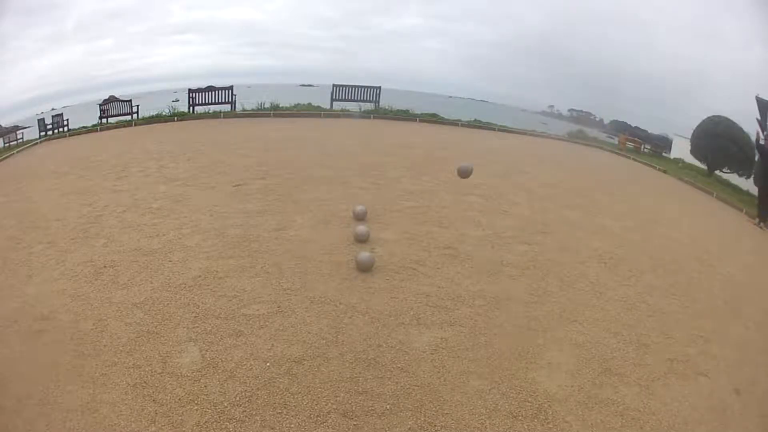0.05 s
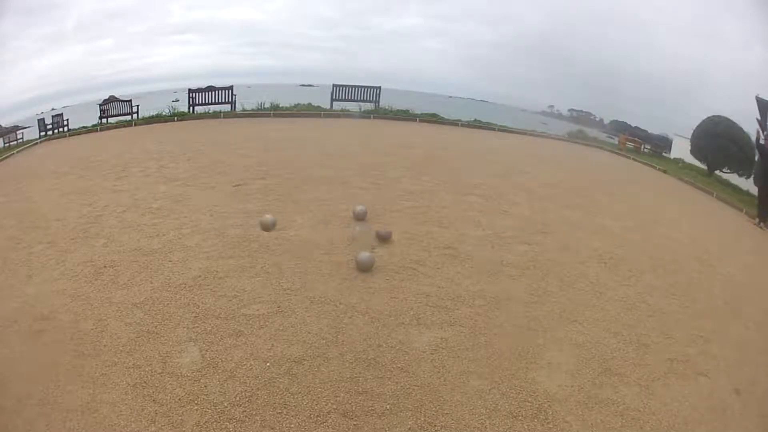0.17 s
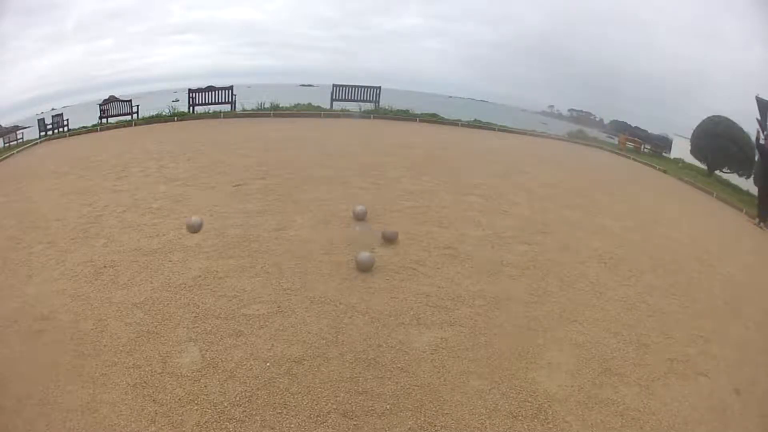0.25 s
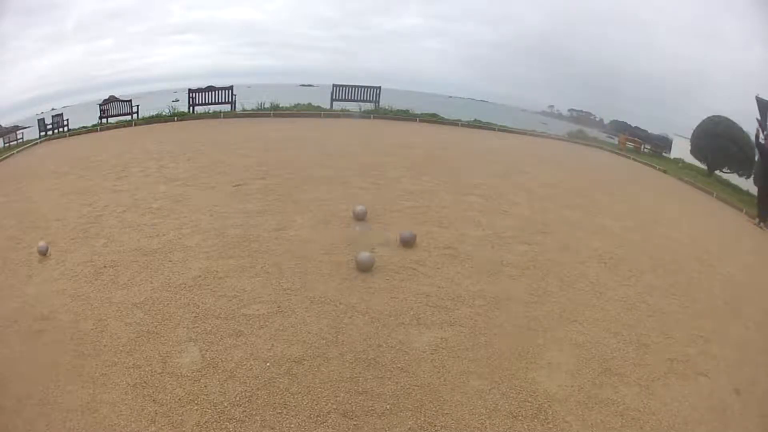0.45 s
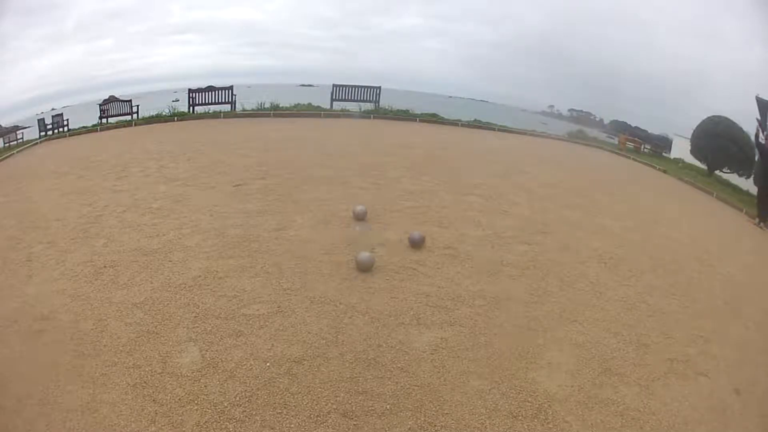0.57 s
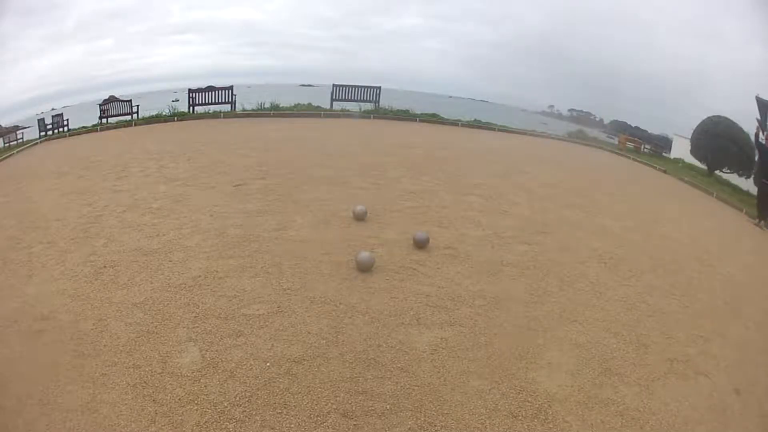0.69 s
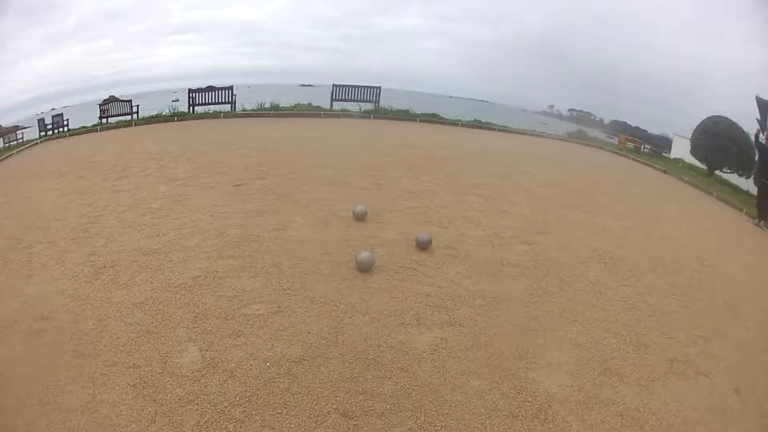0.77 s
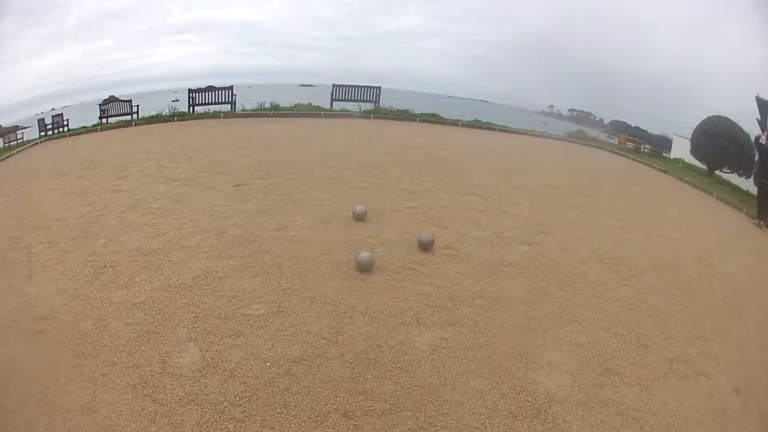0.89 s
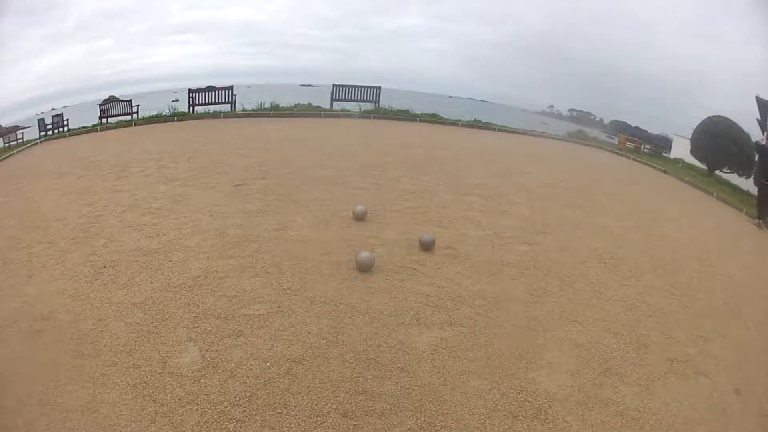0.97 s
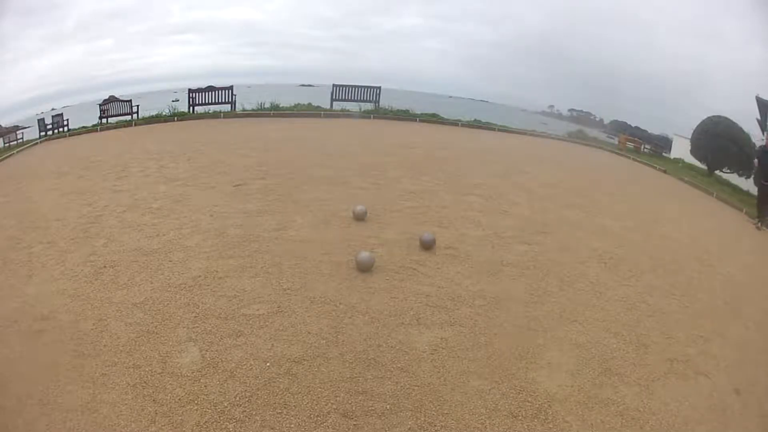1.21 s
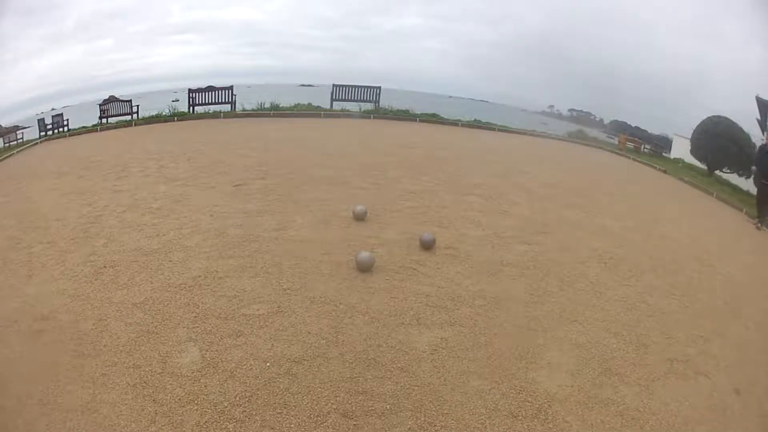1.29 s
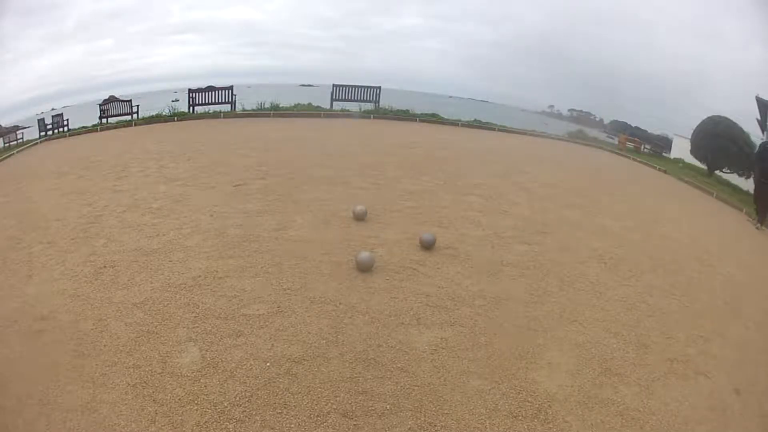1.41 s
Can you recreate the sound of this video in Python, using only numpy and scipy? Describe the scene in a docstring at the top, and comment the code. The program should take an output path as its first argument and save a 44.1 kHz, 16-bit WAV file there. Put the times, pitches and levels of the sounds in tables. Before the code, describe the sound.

One sharp clack of metal boules colliding on gravel, followed by faint, quickening bounces.

```python
"""A gravel boules pitch by the sea, the microphone in a camera standing on the ground.
Close by, a thrown steel boule clacks against another. Grit sprays, and a boule hops away in
shortening bounces, each a faint tick through the air and then a thud through the ground that
shakes the camera. Farther off comes a dull knock, probably the edge board, and a boule rolls on
over the soft wash of the seaside air."""
import sys
import numpy as np
from scipy.fft import rfft, irfft, next_fast_len
from scipy.io import wavfile

SR = 44100
rng = np.random.default_rng(int(sys.argv[2]) if len(sys.argv) > 2 else 0)


def bounce(signal):
    """Save signal as a 16-bit WAV file at the path given by the first command-line argument."""
    frames = np.transpose(np.atleast_2d(signal))
    limited = np.clip(frames, -1, 1)
    pcm = np.round(limited * 32767).astype(np.int16)
    wavfile.write(sys.argv[1], SR, pcm)


N = 63945

# first crack of steel on steel: f/Hz, peak/dB, half-length/s
CRACK_PULSES = [(3770, -14, 0.00047), (8630, -28, .0005)]
# ring of the boules: f/Hz, relative level/dB, t60/s
STEEL_MODES = [(1400, -18, .02), (1680, -18, .02), (2175, -1, .028), (3270, -1, .014), (3600, -7, .012),
               (4100, -8, .012), (4720, -8, .015), (7250, -14, .02), (8000, -14, .012), (8680, -10, .013),
               (9830, -14, .02), (14200, -17, .022), (15130, -17, .018)]
# the clack scattered back by the ground: f/Hz, relative level/dB
SCATTER_COLOUR = [(200, -4), (480, -4), (680, -9), (1100, 3.5), (2200, 3), (3500, -12), (5000, -26),
                  (8000, -20), (10000, -4), (12000, -46), (14500, -10)]
# low ring of the camera mount after the clack: f/Hz, level/dB, t60/s
MOUNT_MODES = [(267.4, -30, 0.15), (457, -44.5, 0.095), (534, -43, 0.1), (893, -37, 0.061),
               (1110, -43, 0.039)]
# landings: t/s, tick level/dB, thud peak/dB, thud f/Hz, thud half-length/s
LANDINGS = [(0.2128, -31.5, -21.5, 156, 0.0086), (0.2438, -86, -32.5, 165, 0.0099),
            (.4750, -51.5, -29, 181, 0.008), (0.5893, -57.5, -43.5, 186, 0.0084),
            (.6805, -57.5, -43.5, 181.4, 0.0059), (0.7782, -59, -53, 190, 0.021),
            (.8325, -58, -59, 185, 0.0082), (.8910, -56, -61, 188, 0.015)]
# tick of grit under a boule: f/Hz, relative level/dB
TICK_COLOUR = [(1000, -34), (3000, 4.5), (4500, 2.5), (7500, 1), (10000, -13), (15000, -22)]
# after-ring of the ground and of the camera mount (272.8 Hz): f/Hz, level re the thud/dB, t60/s
THUD_RING_MODES = [(158.3, -17, 0.27), (187.5, -11, 0.23), (210, -21, 0.067), (272.8, -22.5, 0.34)]
# sway of the camera stand: f/Hz, level re the shake/dB, t60/s
STAND_MODES = [(54.66, -29.5, 0.58), (71.9, -32.5, 0.79)]
# showers of grit: t/s, level/dB, t60/s
SHOWERS = [(0.2419, -32.5, 0.024), (0.2518, -37, 0.049), (0.2782, -48.5, 0.071), (0.2923, -49, 0.053),
           (0.3083, -47.5, 0.029)]
# flying grit: f/Hz, relative level/dB
GRIT_COLOUR = [(200, -18), (500, -1), (1100, -3), (1650, 3.5), (2300, 1), (3200, -5), (4200, -22.5),
               (7500, -25.5), (9800, -9.5), (12000, -28), (14300, -16)]
# a boule skidding on gravel: f/Hz, relative level/dB
SKID_COLOUR = [(200, -14), (450, -2.5), (820, 2), (1150, -12), (1850, -5), (3000, -17), (7000, -36),
               (13500, -22), (15000, -26)]
# resonances of the far knock: f/Hz, half-width/Hz, relative level/dB, factor on the knock's t60
KNOCK_MODES = [(185, 20, -2, 1.8), (280, 14, -6, .8), (465, 15, -6, 1.3), (530, 15, -6, 1.6),
               (626, 15, -9, 1.1), (735, 18, -10, .8), (875, 45, -7, .8), (1110, 50, -9, .6),
               (1380, 70, -14, .9), (1850, 15, -6, .45)]
# dull wash under those resonances: f/Hz, relative level/dB
KNOCK_COLOUR = [(100, -5.5), (500, -7), (1000, -11), (2100, -5), (3000, -21.5), (8000, -22), (13500, -13),
                (15000, -28)]
# crunch of the rolling boule: t/s, level/dB
ROLL_LEVEL = [(0, -74), (.86, -69), (1.0, -64), (1.15, -61), (1.45, -59)]
# the same crunch: f/Hz, relative level/dB
ROLL_COLOUR = [(30, 5), (58, 7.5), (105, -18), (175, 6), (260, 0), (380, 0), (700, -11.5), (1200, -7),
               (2400, -10.5), (3200, -12.5), (4200, -22.5), (9000, -23.5), (15000, -27.5)]
# bumps under the rolling boule: t/s, peak/dB, f/Hz, half-length/s
BUMPS = [(1.15, -53, 168, 0.016), (1.368, -48, 175, 0.013), (1.436, -45, 179, 0.0083)]
# wash of the seaside air: f/Hz, relative level/dB
AIR_COLOUR = [(20, -19), (35, -19), (60, 7), (95, 0.5), (200, 2), (280, -4), (400, -5.5), (620, -11.5),
              (1200, -18), (2200, -19), (4200, -24.5), (8000, -30.5), (11000, -32.5), (15000, -41)]
# the same wash: t/s, level/dB
AIR_LEVEL = [(0, -60.5), (.5, -58), (1.45, -61.5)]


def clack(start=.2088, ring_db=-17, scatter_db=-37.5):
    """Steel on steel, close up: a crack and a hard ring; the ground scatters it, the mount rings on."""
    t = since(start)
    crack = sum(amp(db) * packet(start + .000788, hz, half, rise=0) for hz, db, half in CRACK_PULSES)
    ring = sum((-1) ** k * amp(db) * swell(start, .00038, t60) * np.sin(2 * np.pi * hz * t)
               for k, (hz, db, t60) in enumerate(STEEL_MODES))
    hold_s, release_s, rest = .005, .00043, .2  # the ring drops abruptly to a fifth
    drop = rest + (1 - rest) * .5 * (1 - np.tanh((t - hold_s) / release_s))
    scatter = amp(scatter_db) * swell(start, attack=.0024, t60=.089) * noise(SCATTER_COLOUR)
    mount = ringing(MOUNT_MODES, t, start, attack=.0067)
    return crack + amp(ring_db) * drop * ring + scatter + mount


def landings(ground_delay_s=.0165):
    """Each landing reaches the microphone twice: a tick through the air, then a thud through the ground."""
    tick_level = sum(amp(db) * swell(s, attack=.0004, t60=.014) for s, db, *_ in LANDINGS)
    ticks = tick_level * noise(TICK_COLOUR)
    thuds = sum(thud(s + ground_delay_s, db, hz, half) for s, _, db, hz, half in LANDINGS)
    return ticks + thuds


def thud(s, db, hz, half):
    """A low ground wave centred on s, rising in pitch; it sways the stand and rattles the camera."""
    t = np.arange(N) / SR - s
    onset = s - half
    ground = packet(s, hz, half, rise=6) + ringing(THUD_RING_MODES, t, onset, attack=half)
    sway = ringing(STAND_MODES, t, onset, attack=half)
    rattle = amp(-41.5) * swell(onset, attack=half, t60=.12) * narrow(11920, half_width_hz=100)
    shake = amp(.66 * db)  # grows 0.66 dB per dB of thud
    return amp(db) * ground + shake * (sway + rattle)


def grit(grains_per_s=4500):
    """Showers of tiny stones kicked up by the blow."""
    grains = rng.standard_normal(N) * (rng.random(N) < grains_per_s / SR)
    showers = sum(amp(db) * swell(s, attack=.0024, t60=t60) for s, db, t60 in SHOWERS)
    return showers * coloured(grains, GRIT_COLOUR)


def skid(start=.3246, db=-45.5):
    """A boule scrapes briefly over the gravel."""
    return amp(db) * swell(start, attack=.015, t60=.14) * noise(SKID_COLOUR)


def far_knock(peak_s=.935, db=-52.5, attack_s=.012, base_t60_s=.44):
    """A blurred, dull knock some way off; its lowest resonance lasts longest."""
    decay_db = -60 * since(peak_s) / base_t60_s
    resonances = sum(amp(mode_db + decay_db / stretch) * narrow(hz, half_width)
                     for hz, half_width, mode_db, stretch in KNOCK_MODES)
    wash = amp(-11.5 + decay_db) * noise(KNOCK_COLOUR)
    rise = np.exp(np.minimum(since(0) - peak_s, 0) / attack_s)
    return amp(db) * rise * (resonances + wash)


def rolling():
    """A boule crunches softly over the gravel, one narrow band singing, and meets small bumps."""
    crunch = noise(ROLL_COLOUR)
    whirr = amp(-8) * narrow(1386, half_width_hz=32)
    bumps = sum(thud(*bump) for bump in BUMPS)
    return level(ROLL_LEVEL) * (crunch + whirr) + bumps


def seaside_air():
    """The soft, low wash of open air behind the game."""
    return level(AIR_LEVEL) * noise(AIR_COLOUR)


def amp(db):
    """Decibels to gain."""
    return 10 ** (np.asarray(db) / 20)


def unit(x):
    """Scale to rms 1."""
    return x / np.sqrt(np.mean(x ** 2) + 1e-20)


def since(s):
    """Seconds after s, zero before it."""
    return np.maximum(np.arange(N) / SR - s, 0)


def swell(s, attack, t60):
    """Envelope that rises at s and dies away; all times in seconds."""
    t = since(s)
    return (1 - np.exp(-t / attack)) * amp(-60 * t / t60)


def ringing(modes, t, start, attack):
    """Decaying sines that swell from start, their phase following the time axis t."""
    return sum(amp(db) * swell(start, attack, t60) * np.sin(2 * np.pi * hz * t) for hz, db, t60 in modes)


def packet(s, hz, half, rise):
    """A short burst of waves centred on s, its pitch climbing by rise * hz per second."""
    t = np.arange(N) / SR - s
    return np.exp(-(t / half) ** 2) * np.cos(2 * np.pi * hz * t * (1 + rise * t / 2))


def level(points):
    """Gain per sample from (t/s, level/dB) points."""
    return amp(np.interp(since(0), *np.transpose(points)))


def filtered(x, gain):
    """x times a gain that depends on frequency."""
    size = next_fast_len(N + SR // 4)
    return irfft(rfft(x, size) * gain(np.fft.rfftfreq(size, 1 / SR)), size)[:N]


def coloured(x, points):
    """x shaped by (f/Hz, level/dB) points, at rms 1."""
    f, db = np.transpose(points)
    return unit(filtered(x, lambda hz: amp(np.interp(np.log(hz + 1), np.log(f), db))))


def noise(points):
    """Coloured noise of rms 1."""
    return coloured(rng.standard_normal(N), points)


def narrow(centre_hz, half_width_hz):
    """A narrow band of noise, rms 1."""
    white = rng.standard_normal(N)
    return unit(filtered(white, lambda hz: 1 / (1 + ((hz - centre_hz) / half_width_hz) ** 2)))


def scene():
    """The pitch as heard from ground level, in mono."""
    return (clack() + landings() + grit() + skid() + far_knock() + rolling() + seaside_air())[None]


def record(dry, notch_hz=5990, notch_half_width_hz=387, notch_db=-14, top_hz=15500, edge_hz=110):
    """The camera's microphone: the housing swallows one band, and the top treble is cut off steeply."""
    def response(hz):
        notch = amp(notch_db * np.exp(-((hz - notch_hz) / notch_half_width_hz) ** 2))
        return notch / (1 + np.exp((hz - top_hz) / edge_hz))
    return filtered(dry[0], response)[None]


dry = scene()
out = record(dry)
bounce(out)
```